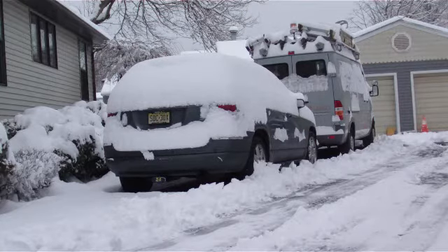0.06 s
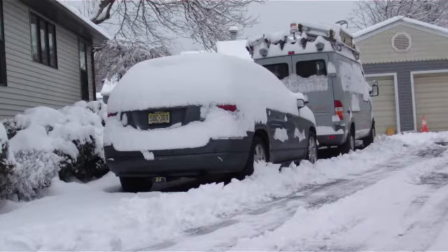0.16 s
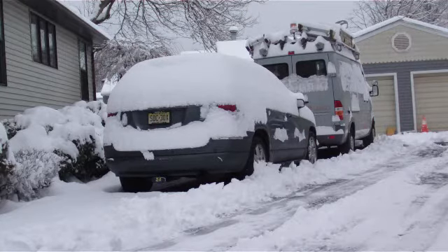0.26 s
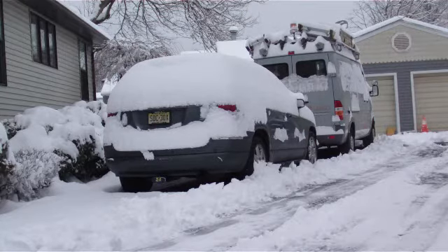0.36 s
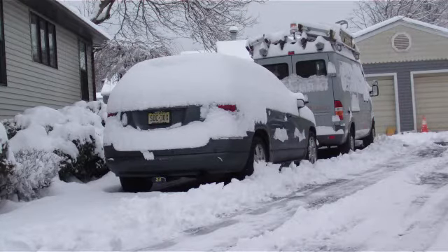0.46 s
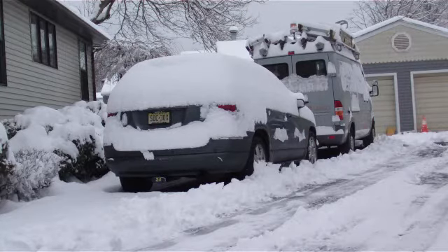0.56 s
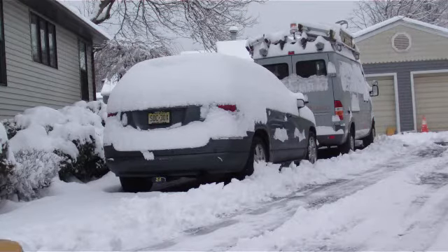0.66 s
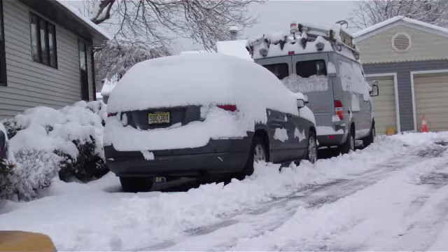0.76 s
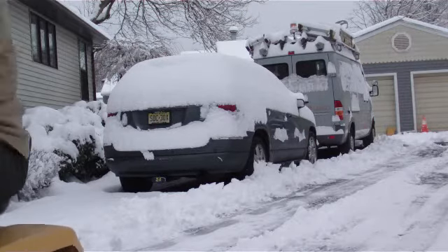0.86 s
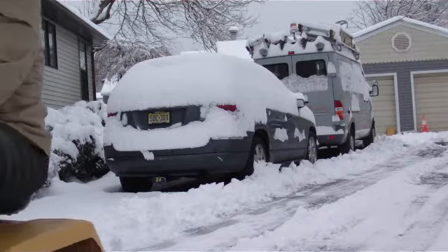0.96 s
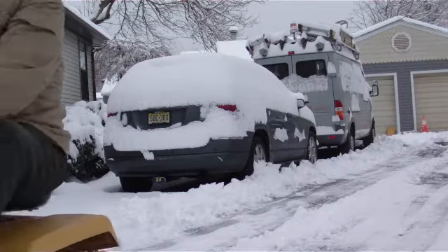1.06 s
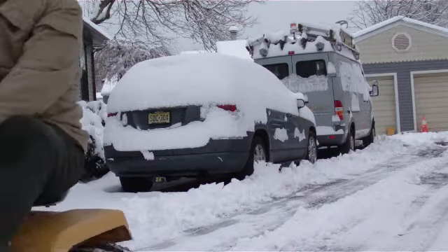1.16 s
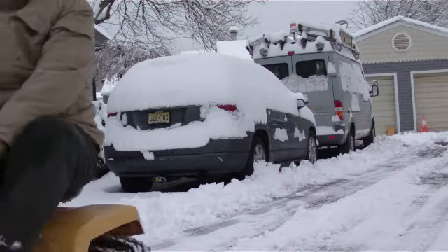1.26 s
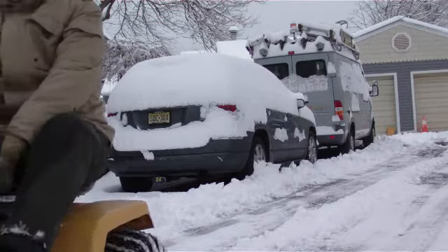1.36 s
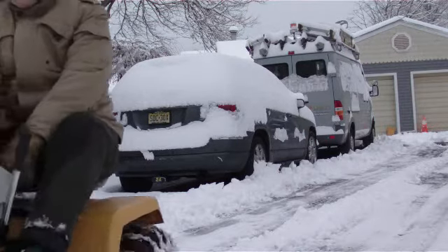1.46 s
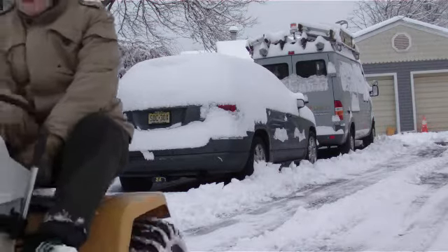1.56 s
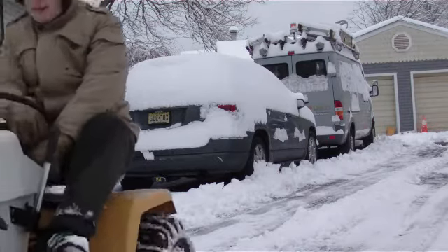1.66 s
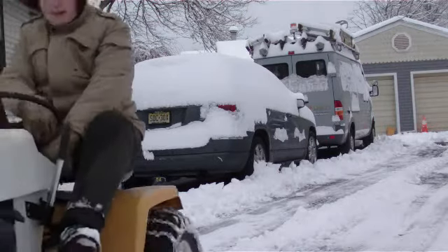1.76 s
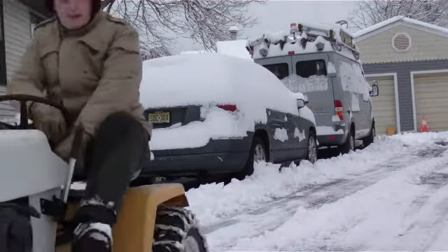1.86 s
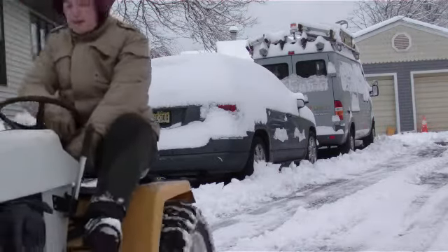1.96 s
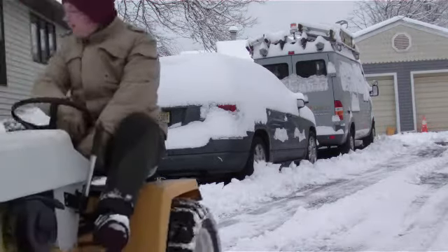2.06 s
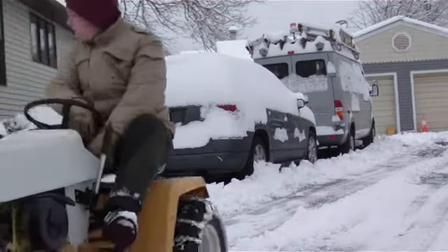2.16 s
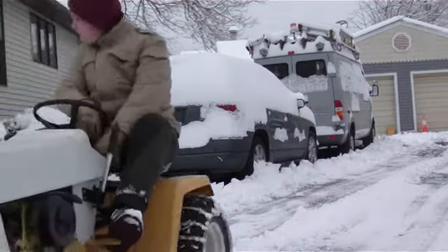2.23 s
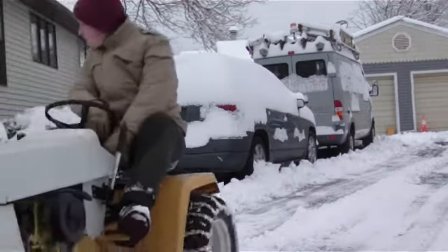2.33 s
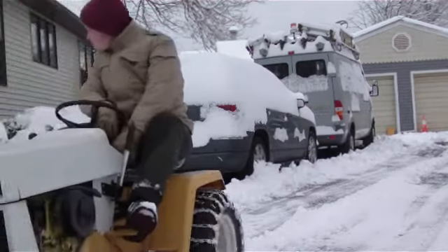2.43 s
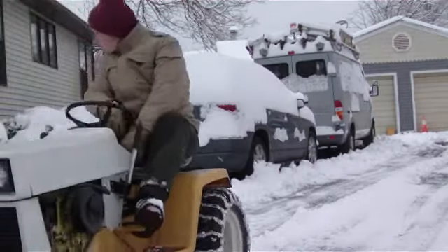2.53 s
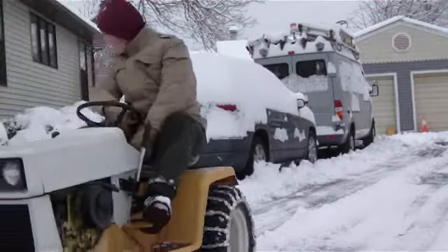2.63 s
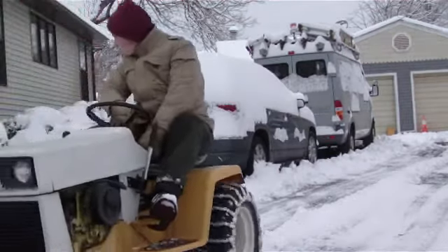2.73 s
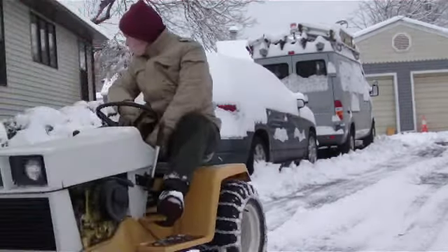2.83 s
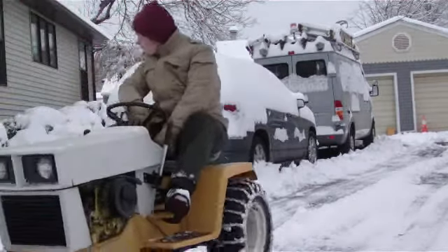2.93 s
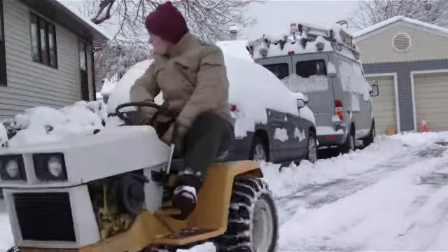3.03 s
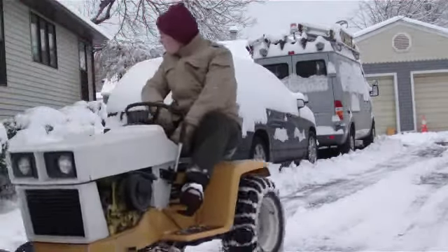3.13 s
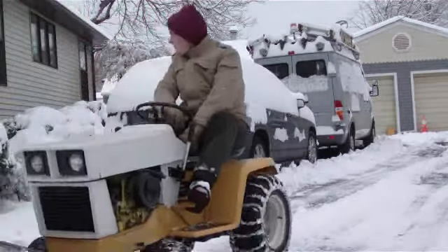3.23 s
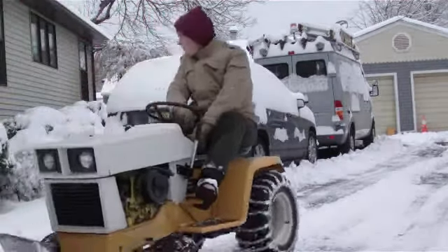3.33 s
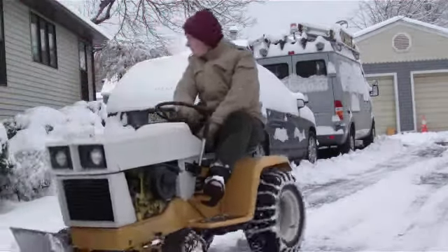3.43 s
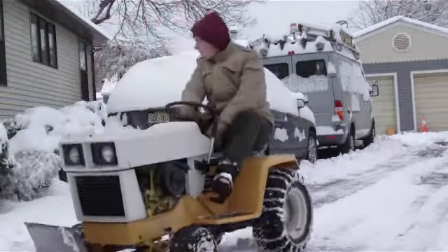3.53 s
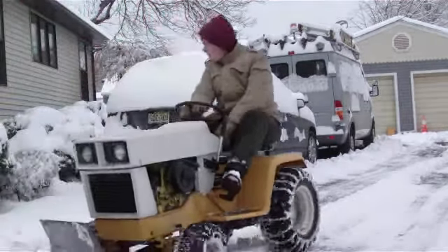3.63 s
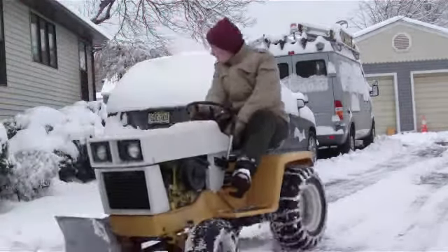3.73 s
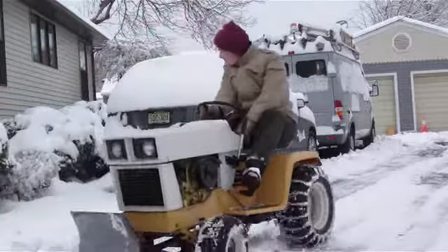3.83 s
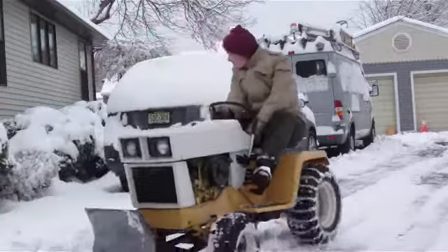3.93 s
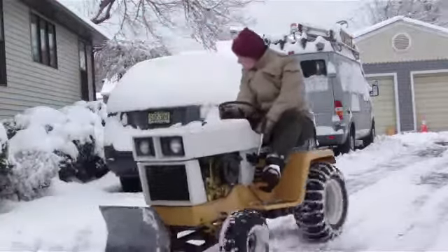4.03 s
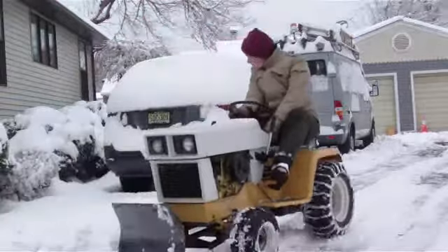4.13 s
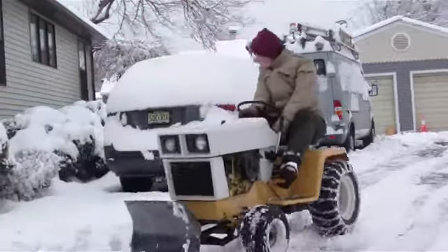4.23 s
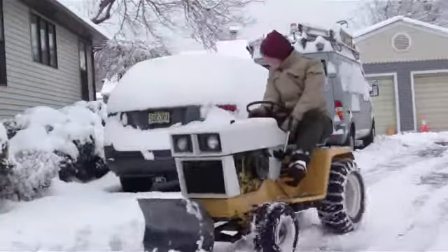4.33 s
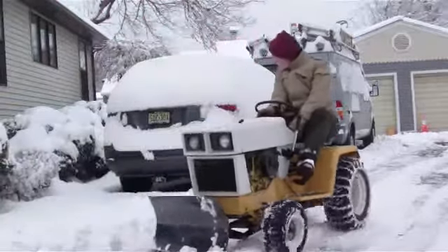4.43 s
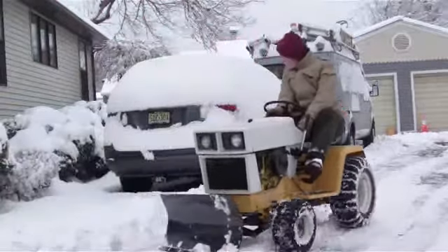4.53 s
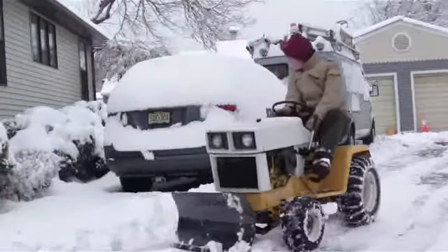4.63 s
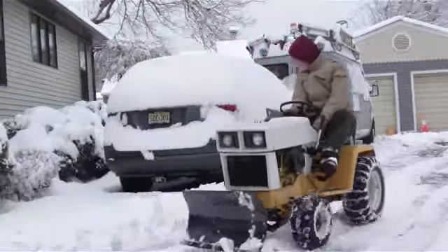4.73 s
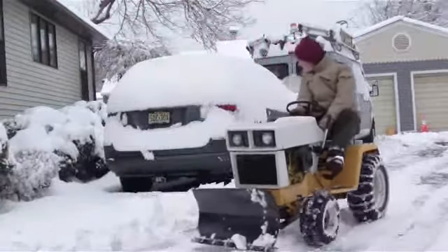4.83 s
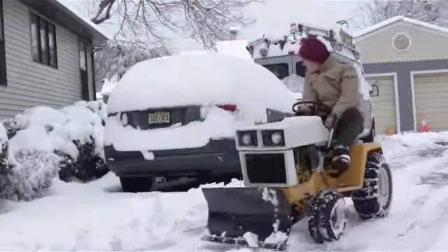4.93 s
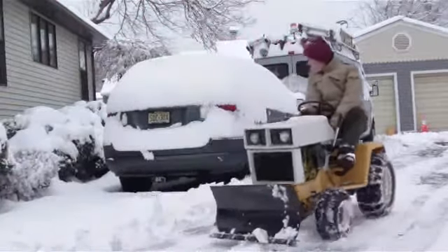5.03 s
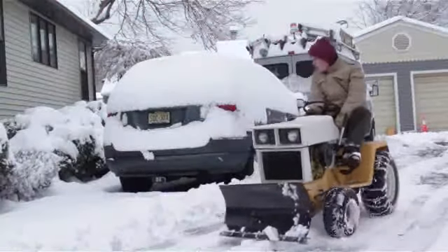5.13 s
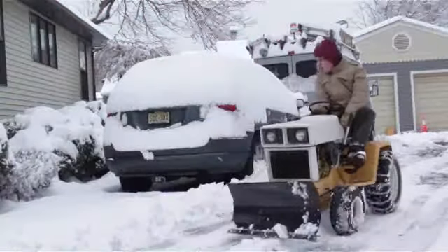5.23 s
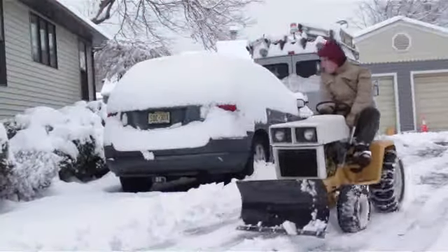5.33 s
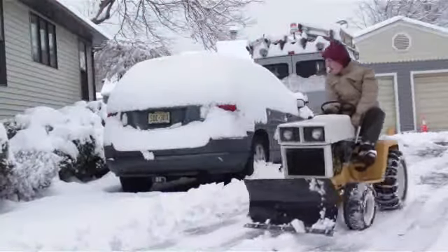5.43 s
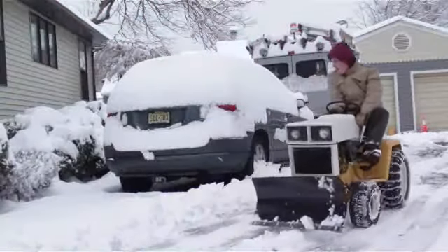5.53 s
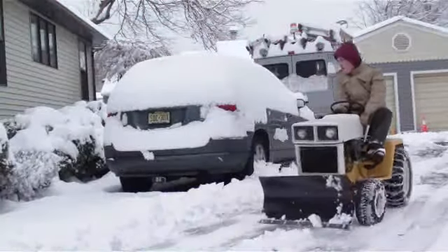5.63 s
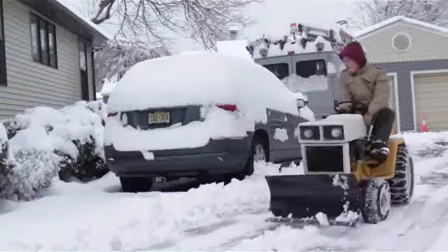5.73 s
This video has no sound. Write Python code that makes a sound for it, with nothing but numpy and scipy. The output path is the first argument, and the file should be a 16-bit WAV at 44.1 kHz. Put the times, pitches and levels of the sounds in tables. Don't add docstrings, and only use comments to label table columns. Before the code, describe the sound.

A small single-cylinder tractor engine thuds rapidly past at close range with a squeaking belt and hissing exhaust, then backs away up a snowy drive.

```python
import sys
import numpy as np
from scipy import signal
from scipy.io import wavfile
from scipy.ndimage import uniform_filter1d

SR = 44100
rng = np.random.default_rng(int(sys.argv[2]) if len(sys.argv) > 2 else 0)


def magnitude_from_level(level_db):
    exponent = np.asarray(level_db, float) / 20
    return 10 ** exponent


def transcribe(signal):
    frames = np.atleast_2d(signal).T
    limited = np.clip(frames, -1, 1)
    pcm = np.round(limited * 32767).astype(np.int16)
    wavfile.write(sys.argv[1], SR, pcm)


N = 254898
TIME = np.arange(N) / SR
HOP = 128
HZ = np.fft.rfftfreq(4 * HOP, 1 / SR)[:, None]


def evened(x):
    return x / np.sqrt(np.mean(x ** 2) + 1e-20)


def smooth_random(size):
    return evened(uniform_filter1d(rng.standard_normal(N), size=size))


def curves(table):
    s, *columns = np.transpose(table)
    return [np.interp(TIME, s, c) for c in columns]


def read(points):
    f, value = np.transpose(points)
    return np.interp(np.log(HZ + 1), np.log(f + 1), value)


def by_frame(away):
    return np.append(away[::HOP], np.full(6, away[-1]))


def ring(hz, t60):
    t = TIME[:SR // 2]
    return magnitude_from_level(-60 * t / t60) * np.sin(2 * np.pi * hz * t)


def burst(turns, at, rise, fall, spread_db):
    place = turns - at + 1
    since = place % 1
    strength = magnitude_from_level(spread_db * rng.standard_normal(200))[place.astype(int)]
    return strength * (1 - np.exp(-since / rise)) ** 2 * np.exp(-since / fall)


def blows(turns, at, spread_db):
    clicks = np.diff(np.floor(turns - at), prepend=np.floor(turns[0] - at) - 1)
    clicks[0] = 0
    return clicks * magnitude_from_level(spread_db * rng.standard_normal(N))


def noise(colour_db, patchy_db):
    a, b, patches = rng.standard_normal((colour_db.shape[1], colour_db.shape[0], 3)).T
    patches = uniform_filter1d(patches, size=6, axis=0)
    patches = evened(uniform_filter1d(patches, size=16, axis=1))
    z = (a + 1j * b) * magnitude_from_level(colour_db + patchy_db * patches)
    out = signal.istft(z, nperseg=4 * HOP, noverlap=3 * HOP)[1][:N]
    return out / np.sqrt(uniform_filter1d(out ** 2, size=SR // 2))


def swell(s, width, db):
    return db * np.exp(-((TIME - s) / width) ** 2)


def levels():
    # (time [s], level [dB])
    nearness = [
        (0, -7),
        (.6, -3),
        (1.2, 0.5),
        (1.7, -1.5),
        (2.4, -5.5),
        (3.5, -7.5),
        (3.95, -11),
        (4.6, -11),
        (5.2, -11),
        (5.78, -11.5),
    ]
    parts = {"thump": (-17.5, 0.14, 0.01), "knock": (-22, 0.55, 0.01), "airbox": (-33.5, 0.58, 0.0052),
             "squeak": (-18, 0.8, 1), "wash": (-15, 0.93, 1), "jet": (-10, 1.06, .99),
             "spray": (-26.5, 1.2, 5.4), "low panels": (-17, 1.61, 0.01),
             "middle panels": (-28.5, 0.86, 0.01), "high panels": (-32, 0.52, 0.01)}
    # (part, time [s], half width [s], level [dB])
    facing = [("thump", 0.55, 1.18, 5.6), ("thump", 2, 0.99, 3.6), ("spray", 3.06, .5, 3.8),
              ("knock", 1.2, 0.36, 1.7), ("spray", 2.69, 0.06, -18), ("spray", 4.42, 0.045, -7),
              ("squeak", 1.25, 0.43, 3.5), ("low panels", 0.24, 0.39, 4), ("squeak", 0.13, 0.59, -3.2),
              ("jet", .05, .3, -2.4), ("knock", 0.55, 1.1, 11.8), ("wash", 0.098, 0.44, 1.26),
              ("wash", 3.5, 0.62, 1), ("thump", 4.14, 0.63, 3.2), ("airbox", 0.41, 0.56, 12),
              ("airbox", 1.57, 0.27, 14), ("squeak", 1.84, .3, 2.8), ("squeak", 3.93, 0.51, -28),
              ("jet", 3.7, 0.93, 0.86), ("spray", 1.2, 0.25, 4.8), ("spray", 5.5, .35, 4.5),
              ("low panels", 0.86, .15, 5.9), ("low panels", 2.22, .45, 6),
              ("middle panels", 2.2, 0.46, 17.5), ("middle panels", 4.25, 0.94, 17),
              ("high panels", 0.86, 0.11, 18), ("high panels", 2.34, 0.9, 18.3),
              ("high panels", 3.99, 1, 17.2)]
    # (time [s], half width [s], level [dB])
    lurches = [(1.76, 0.15, -1), (1.98, 0.16, 1.5), (2.24, 0.022, 0), (2.41, .07, 0), (2.6, 0.02, 1.5),
               (2.69, 0.019, -0.5), (3.17, 0.021, -1.5), (3.95, 0.043, -1), (4.42, 0.05, 0),
               (4.83, 0.013, -3), (5.0, 0.084, -0.5), (5.58, 0.024, 1.5)]
    near_db = curves(nearness)[0]
    lurch_db = sum(swell(*row) for row in lurches)
    out = {}
    for part, (db, follow, shaken) in parts.items():
        out[part] = db + follow * near_db + shaken * lurch_db
    for part, *row in facing:
        out[part] = out[part] + swell(*row)
    return out


def engine_load(turns, away):
    firing = .55 * burst(turns, .84, .05, .2, 1.5)
    intake = .6 * (1 - .8 * away) * burst(turns, .52, .04, .15, 2.5)
    exhaust = .35 * burst(turns, .08, .04, .15, 2.5)
    return evened(1 + firing + intake + exhaust)


def fan_wash(away, load):
    # (frequency [Hz], density [dB per Hz])
    close_wash = [(110, -25), (180, -10.5), (247, -7.5), (424, -3.5), (663, -1), (741, -6.5), (1080, -5),
                  (2400, -9), (3290, -7), (4600, -11), (6550, -8), (10000, -19), (11200, -47), (13000, -14),
                  (15400, -70)]
    # (frequency [Hz], density [dB per Hz])
    distant_wash = [(110, -32), (180, 1.5), (238, -6.5), (352, -6.5), (511, -7.5), (727, -8), (1450, -7.5),
                    (1880, -4), (2940, -10.5), (3540, -7), (5640, -9), (8500, -2), (10800, -11),
                    (12800, -26), (15400, -37)]
    share = by_frame(away)
    colour_db = (1 - share) * read(close_wash) + share * read(distant_wash)
    return noise(colour_db, patchy_db=0.83) * load * magnitude_from_level(0.92 * smooth_random(2500))


def spray(away, load):
    # (frequency [Hz], level [dB])
    fizz = [(10500, -22), (12250, -15), (12800, -4), (13400, -4), (14300, -2), (15300, -9), (15600, -36)]
    return noise(read(fizz) + 0 * by_frame(away), patchy_db=4.0) * load ** (3.6 - 2.8 * away)


def chains():
    # (time [s], peak level [dB], frequency [Hz])
    clinks = [
        (5.0744, -13, 9100),
        (5.1767, -6, 10000),
        (5.225, -8, 9800),
        (5.252, -8.5, 9900),
        (5.3492, -12, 9710),
        (5.6266, -14, 11000),
    ]
    # (time [s], peak level [dB], frequency [Hz])
    clanks = [
        (2.1016, -5, 3730),
        (2.2782, -4.5, 3740),
        (2.586, -7, 3400),
        (2.9816, -8, 3640),
        (5.2405, -17, 3700),
        (5.2646, -13, 3700),
        (5.2856, -17, 3830),
        (5.3358, -15, 3730),
    ]
    out = np.zeros(N + SR)
    for s, db, hz in clinks + clanks:
        clink = ring(hz, .04) + .8 * ring(hz * 1.03, .035) + .5 * ring(hz * .655, .04)
        clink *= 1 - np.exp(-TIME[:len(clink)] / 0.0014)
        out[round(s * SR):][:len(clink)] += magnitude_from_level(db + 1.0) * clink
    return out[:N]


def panel_hum(turns, groups_db):
    # (frequency [Hz], width [Hz], level [dB])
    panels = [
        [(745, 17, -10), (836, 27, -12.5), (894, 64, -6.5)],
        [(1018, 18, -14), (1187, 60, -14.5)],
        [(1814, 220, -10), (1960, 250, -17), (2520, 250, -14.5)],
    ]
    out = np.zeros(N)
    for group, level_db in zip(panels, groups_db):
        shake = .35 + burst(turns, .9, .03, .15, 2.5) + .7 * burst(turns, .45, .03, .15, 2.5)
        for hz, width, db in group:
            band = signal.butter(1, [hz - width / 2, hz + width / 2], "bandpass", fs=SR)
            out += magnitude_from_level(db + level_db) * evened(signal.lfilter(*band, shake * rng.standard_normal(N)))
    return out


def valve_knock(turns, modes):
    column = sum(magnitude_from_level(db) * ring(hz, t60) for hz, db, t60 in modes)
    column = column * (1 - np.exp(-TIME[:len(column)] / .002))
    return evened(signal.oaconvolve(blows(turns, .465, 1.0), column)[:N])


def airbox(turns):
    # (frequency [Hz], level [dB], t60 [s])
    housing = [(361.3, 5.5, 0.14), (320.6, -3, 0.33)]
    return valve_knock(turns, housing)


def intake(turns):
    # (frequency [Hz], level [dB], t60 [s])
    air_column = [(418.7, 7, 0.058), (430, -8, 0.094)]
    return valve_knock(turns, air_column)


def belt_squeak(turns, hz, away):
    overtones = [6.2, 4.5, 5.5, -8]
    turns = turns - .07 * np.sqrt(away + TIME / 20)
    bite = rng.random(N // 130 + 1)[np.arange(N) // 130] ** 1.5
    flutter = smooth_random(25)
    phase = 2 * np.pi * np.cumsum(hz * (.95 + .145 * bite + .016 * flutter)) / SR
    tone = sum(magnitude_from_level(db) * np.cos((k + 1) * phase) for k, db in enumerate(overtones))
    rub_band = signal.butter(2, [9800, 14000], "bandpass", fs=SR)
    rub = signal.lfilter(*rub_band, rng.standard_normal(N))
    grip = magnitude_from_level(4.8 * smooth_random(70))
    slips = .06 + .8 * burst(turns, .03, .04, .14, 2) + burst(turns, .53, .04, .12, 2)
    return evened((evened(tone) + magnitude_from_level(-10 - 23 * away) * evened(rub)) * grip * slips)


def exhaust_jet(turns, away):
    # (frequency [Hz], level [dB])
    jet_colour = [(1000, -13), (2000, -20), (4000, -13.5), (6000, -4), (7600, 1.5), (8400, 3), (9600, -2),
                  (10800, -8), (12200, -14.5), (15500, -18)]
    shade_db = 1.5 * (1 - by_frame(away)) * (HZ < 6830)
    hiss = noise(read(jet_colour) + shade_db, patchy_db=2.7)
    late = turns - .045 * away
    puffs = .02 + burst(late, .835, .045, .05, 1.3)
    puffs += .09 * burst(late, .95, .04, .2, 2.5)
    puffs += .05 * burst(turns, .13, .01, .03, 5)
    puffs += .09 * (1 - .7 * away) * burst(turns, .53, .04, .15, 2.5)
    return evened(hiss * puffs)


def muffler_thump(turns, away):
    # (frequency [Hz], signed share [1], t60 [s])
    close_rings = [(102, -.53, .128), (34.3, .31, .184), (128.6, .435, .132), (63, -.157, .118),
                   (202, .02, .3)]
    # (frequency [Hz], signed share [1], t60 [s])
    distant_rings = [(105.8, -.314, .152), (35, .176, .108), (122, -.049, .5), (156.5, .018, .5),
                     (200, .018, .25)]
    near = sum(share * ring(hz, t60) for hz, share, t60 in close_rings)
    far = sum(share * ring(hz, t60) for hz, share, t60 in distant_rings)
    near = evened(signal.oaconvolve(blows(turns, -.174, .4), near)[:N])
    far = evened(signal.oaconvolve(blows(turns, -.133, .4), far)[:N])
    return (1 - away) * near + away * far


def scene():
    # (time [s], firing rate [1/s])
    firing = [
        (0, 20.185),
        (.5, 20.29),
        (1, 19.849),
        (1.5, 20.232),
        (2.5, 20.425),
        (3.5, 19.909),
        (4.25, 19.867),
        (5.5, 20.739),
        (5.78, 20.212),
    ]
    # (time [s], away [0-1], belt pitch [Hz])
    leaving = [
        (0, 0, 3280),
        (1.3, 0.11, 3320),
        (2.1, 0.48, 3438),
        (3, 0.71, 3502),
        (3.9, 0.7, 3446),
        (5.78, 0.96, 3653),
    ]
    turns = .3476 + np.cumsum(curves(firing)[0]) / SR
    away, belt_hz = curves(leaving)
    level = levels()
    load = engine_load(turns, away)
    panels_db = [level[group + " panels"] for group in ("low", "middle", "high")]
    mix = magnitude_from_level(level["wash"] + 4.5 + 2.9 * away) * fan_wash(away, load)
    mix += magnitude_from_level(level["spray"]) * spray(away, load)
    mix += chains()
    mix += panel_hum(turns, panels_db)
    mix += magnitude_from_level(level["airbox"]) * airbox(turns)
    mix += magnitude_from_level(level["knock"] - 7.0 - 5.0 * away) * intake(turns)
    mix += magnitude_from_level(level["squeak"] + 7.5 - 12.3 * away) * belt_squeak(turns, belt_hz, away)
    mix += magnitude_from_level(level["jet"] - 1.0) * exhaust_jet(turns, away)
    mix += magnitude_from_level(level["thump"] - 0.2) * muffler_thump(turns, away)
    return mix[None]


def overload(x):
    knee = 12.0
    return x / (1 + abs(x / 0.88) ** knee) ** (1 / knee)


def starve_treble(x, below_db, wobble_db):
    hz, t, z = signal.stft(x, SR, nperseg=2048, noverlap=1536)
    power = uniform_filter1d(abs(z) ** 2, size=12, axis=0)
    power_db = 10 * np.log10(uniform_filter1d(power, size=6, axis=1) + 1e-16)
    hiss_db = power_db[(hz > 6000) & (hz < 10000)].mean(0)
    wobble = rng.standard_normal((len(t), len(hz)))
    wobble = evened(uniform_filter1d(wobble, size=12, axis=0)).T
    wobble = wobble[np.arange(len(hz)) // 7]
    kept = (power_db + wobble_db * wobble > hiss_db - below_db) | (hz[:, None] < 11200)
    kept &= (hz[:, None] < 15330) & (hz[:, None] > 5)
    return signal.istft(z * kept, SR, nperseg=2048, noverlap=1536)[1][:N]


def low_pass(x):
    return signal.sosfilt(signal.butter(12, 15570, fs=SR, output="sos"), x)


def record(dry):
    thinned = starve_treble(overload(dry[0]), below_db=16.0, wobble_db=5.0)
    return low_pass(thinned[None])


dry = scene()
out = record(dry)
transcribe(out)
```